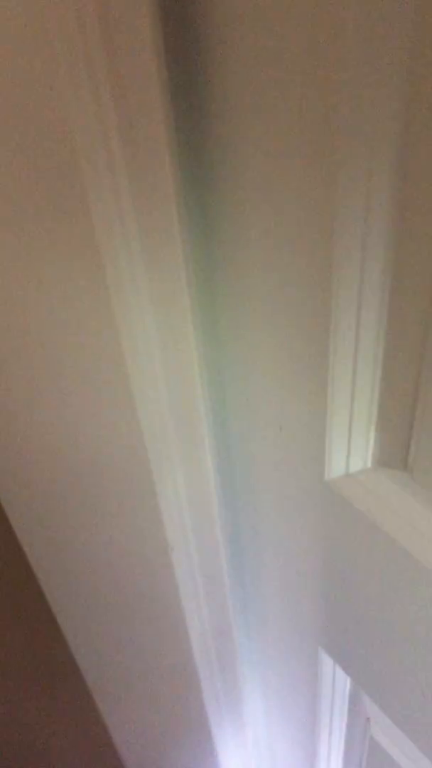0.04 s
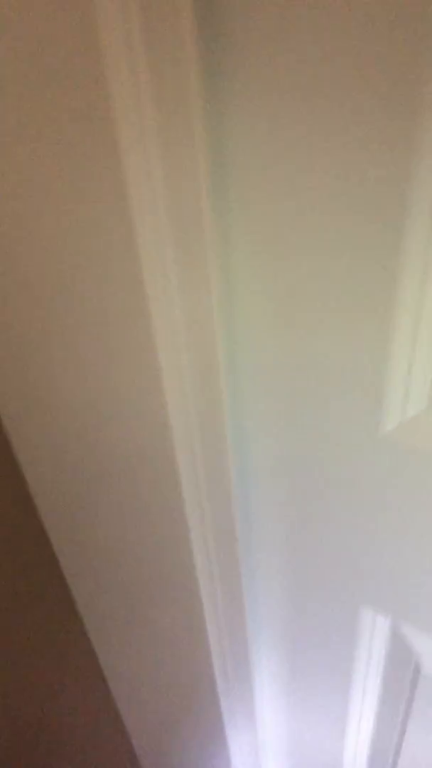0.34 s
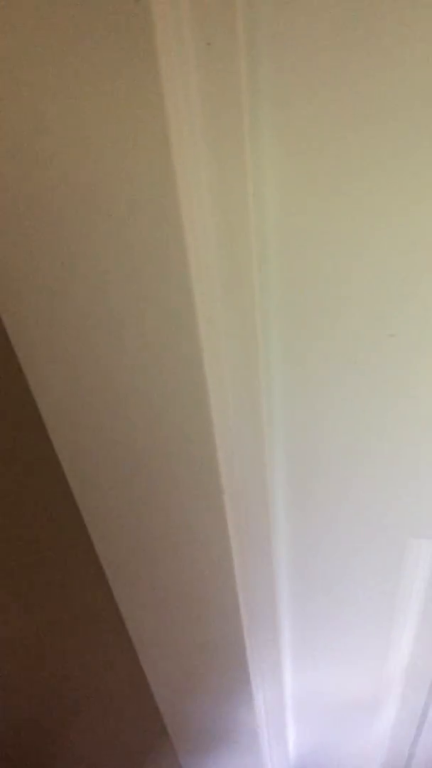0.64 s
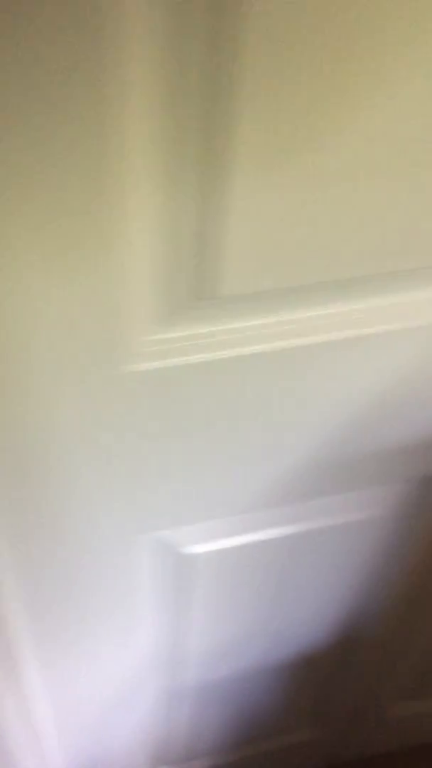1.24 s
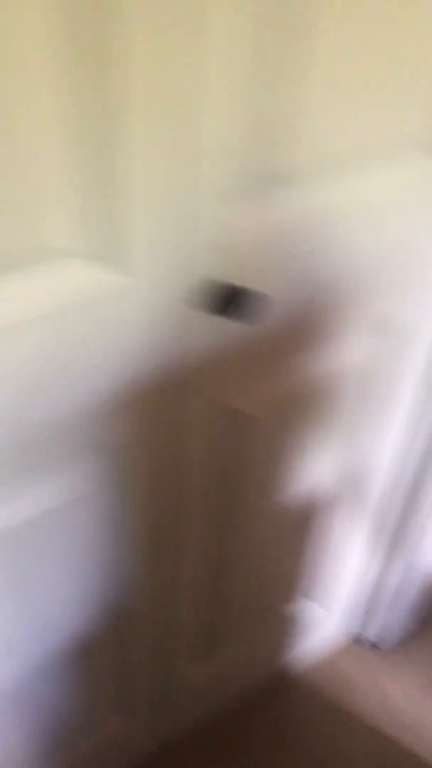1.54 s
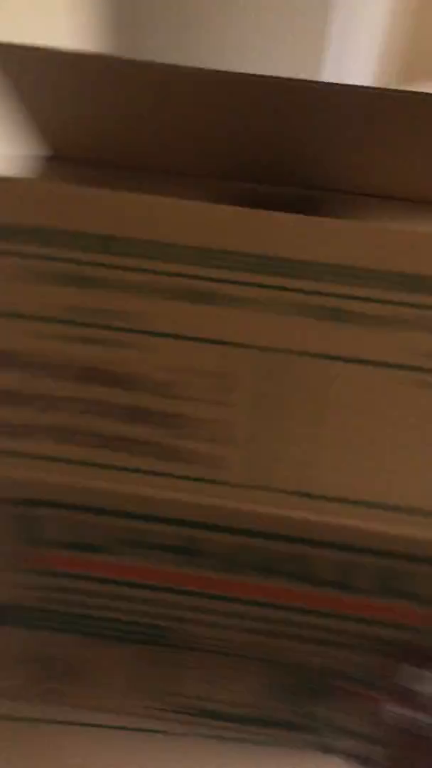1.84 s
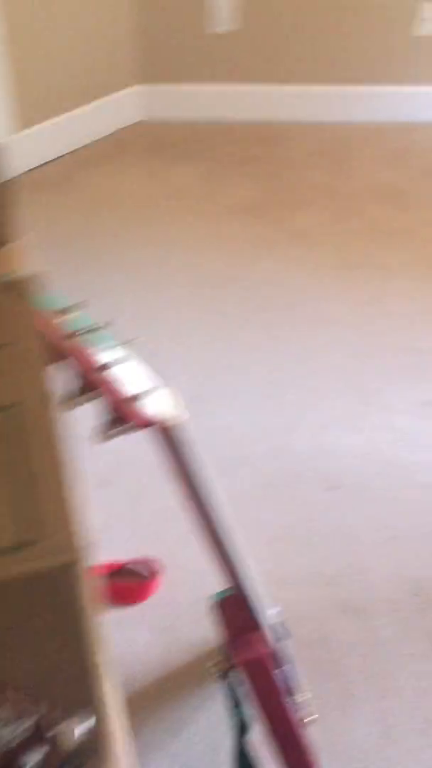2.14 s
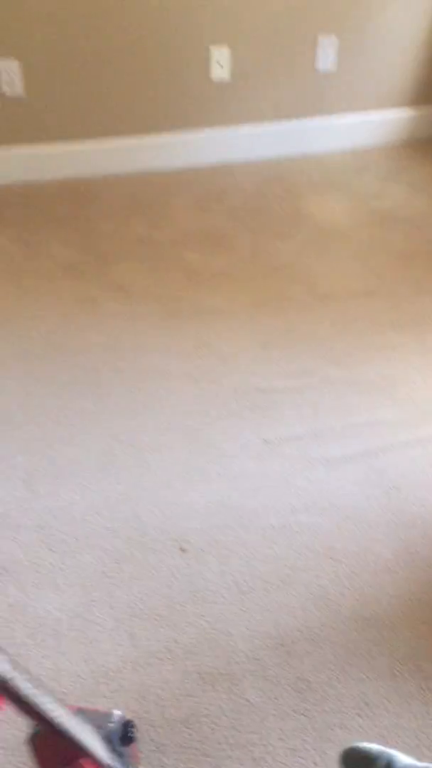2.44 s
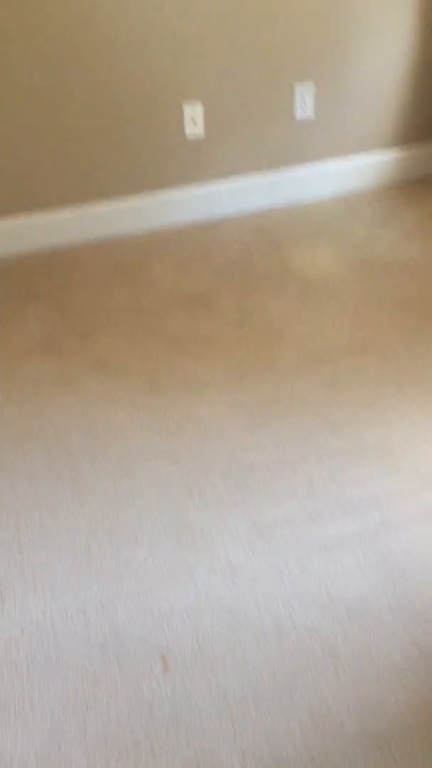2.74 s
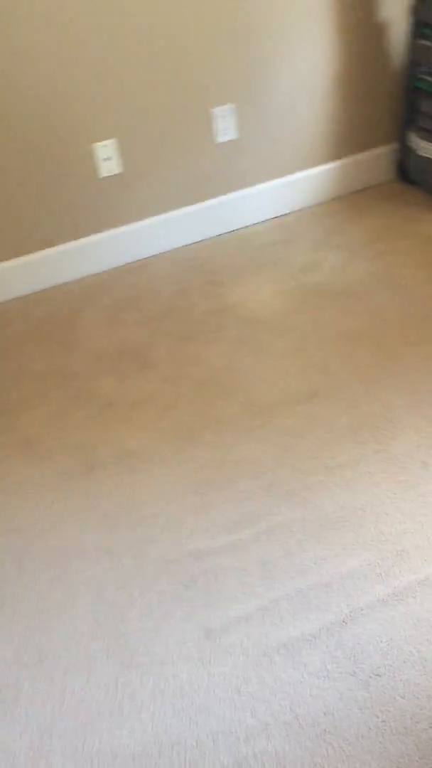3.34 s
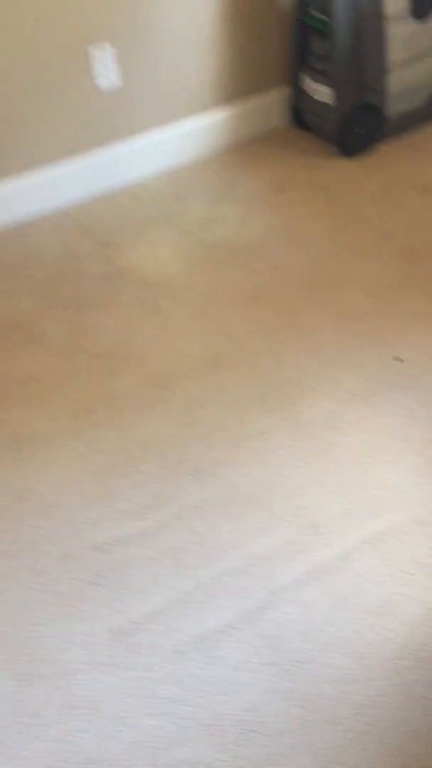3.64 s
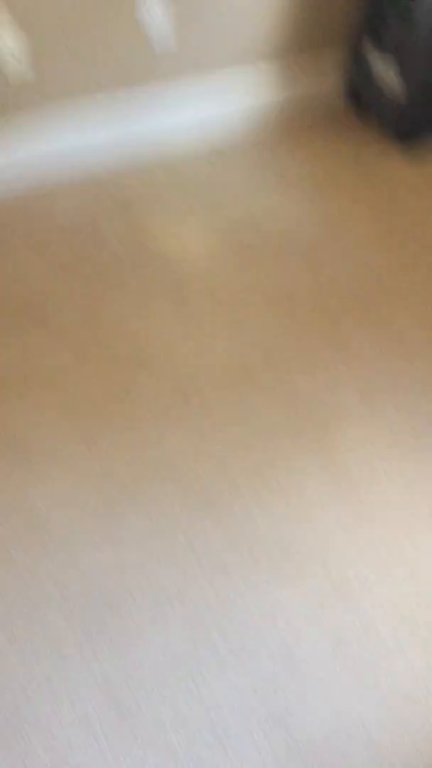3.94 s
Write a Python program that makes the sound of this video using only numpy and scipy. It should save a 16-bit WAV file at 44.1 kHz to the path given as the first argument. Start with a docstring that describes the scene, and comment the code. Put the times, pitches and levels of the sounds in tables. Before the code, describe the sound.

A wooden door brushes over carpet, knocks and clicks, followed by soft footsteps.

```python
"""A hollow wooden door is pushed open over carpet. From the start its lower edge brushes the pile,
and stick-slip friction makes the leaf chatter. Knocks excite the leaf's modes, most strongly near
0.9 s, and at 1.2 s the steel latch clicks. Someone then walks softly into the room, each step a thud
in the floor and a scuff on the pile. Throughout, the house booms and rumbles, a fan hums and moving
air hisses with a thin whistle."""
import sys
import numpy as np
from scipy import signal
from scipy.fft import rfft, irfft
from scipy.io import wavfile
from scipy.ndimage import uniform_filter1d, map_coordinates

SR = 44100
rng = np.random.default_rng(int(sys.argv[2]) if len(sys.argv) > 2 else 0)


def master(y):
    """Save y as 16-bit WAV."""
    cut = np.clip(np.atleast_2d(y).T, -1, 1)
    pcm = np.round(cut * 32767)  # scale
    wavfile.write(sys.argv[1], SR, pcm.astype(np.int16))


N = 176400
TOP_HZ = 15850

# Spectrum of a contact on wood. Each row: frequency in Hz, relative density in dB.
WOOD_SPECTRUM = [(100, -14), (300, 3.5), (600, -5), (1000, -4), (1400, -2), (2200, -1), (3300, -2),
                 (4800, -9.5), (7500, -15), (9300, -13.5), (10800, -25), (15500, -22)]


def door_knocks():
    """Impact excitation: each blow cracks on the wood and sets the leaf vibrating freely."""
    # Each row: start in seconds, contact gain in dB, contact cutoff in Hz, leaf gain in dB.
    knocks = [(0.191, -8, 1000, -27), (0.4456, -11, 2500, -10.5), (0.4873, -7.5, 7540, -22),
              (.502, -20, 2500, -14.5), (0.533, 1.5, 2220, -17), (0.886, -4.5, 1290, -11.5),
              (0.909, -3, 350, -11.5), (0.9221, -4.5, 8900, -0.5), (0.9253, -3, 3630, -17),
              (1.1977, -9.5, 1510, -16), (1.218, -8, 403, -17.5)]
    contacts, ringing = np.zeros(N), np.zeros(N)
    for at, db, cutoff_hz, leaf_db in knocks:
        blow = impact(WOOD_SPECTRUM, cutoff_hz, t60=0.076, room_db=-9.5)
        crack = np.hypot(1, undb(-2.5) * decay(clock()[:len(blow)], t60=0.0079))
        add(contacts, at, undb(db - 23) * blow * crack)
        add(ringing, at, undb(leaf_db) * leaf_modes())
    return wood_resonances(contacts) + ringing


def leaf_modes():
    """Modal superposition: the leaf rings as damped sines, a little differently at each blow."""
    # Each row: frequency in Hz, relative level in dB, time to fall 60 dB in seconds.
    modes = [(63.2, -2, 0.46), (103.2, 0, 0.58), (147, -14, 0.5), (172.3, 1.5, 0.31), (257, -14, 0.52),
             (282.4, -12, 0.4), (337, -12, 0.3), (541.4, -12.5, 0.13), (639, -20, 0.2), (1410, -13.5, 0.12),
             (1588, -20.5, 0.09), (1908, -11, 0.12), (2263, -15, 0.21), (3210, -16, 0.089)]
    t, out = clock()[:SR], 0
    for k, (hz, db, t60) in enumerate(modes):
        amplitude = (-1) ** k * undb(db + rng.standard_normal())
        detuned_hz = hz * (1 + 0.0037 * rng.standard_normal())
        out += amplitude * np.sin(2 * np.pi * detuned_hz * t) * decay(t, t60)
    return undb(-26.5) * out


def door_drag():
    """Stick-slip friction: the leaf chatters as its edge drags harder, heard through the wood."""
    # Each row: time in seconds, level in dB.
    levels = [(.15, -59), (.2, -44.5), (.25, -55), (.35, -61), (.4, -43.5), (.45, -41.5), (.5, -39.5),
              (.55, -47), (.6, -49), (.66, -65)]
    slips = colour(grains(spread=0.93), WOOD_SPECTRUM)
    muffled = signal.sosfilt(signal.butter(2, 3200, fs=SR, output="sos"), slips)
    dragging = (clock() > levels[0][0]) * (clock() < levels[-1][0])
    return wood_resonances(muffled * envelope(levels) * dragging)


def wood_resonances(x, depth_db=1.5, spacing_hz=32):
    """Dense upper modes act as a minimum-phase filter, which rings only after it is excited."""
    hz = np.fft.rfftfreq(N, 1 / SR)
    peaks = np.interp(hz / spacing_hz, np.arange(2000), rng.standard_normal(2000))
    depth = depth_db * np.clip(hz / 500, 0, 1) * np.clip(4000 / (hz + 1), 0, 1)
    gain = undb(depth * (np.clip(peaks, -2, 2) - 0.19))
    cepstrum = irfft(np.log(gain), N)
    response = np.exp(rfft(2 * cepstrum[:N // 2], N))
    return irfft(rfft(x) * response, N)


def carpet_brush():
    """Friction noise: carpet fibres flick past the door's edge, louder the faster it moves."""
    # Each row: time in seconds, relative level in dB.
    levels = [(0, -35), (.03, -25.5), (.1, -17), (.19, -10.5), (.33, -9), (.365, -7), (.394, -2.5),
              (.43, -5), (.5, -6), (.55, -3.5), (.6, -12), (.7, -14.5), (.87, -13), (.93, -19.5),
              (.97, -42)]
    # Each row: frequency in Hz, relative density in dB.
    pile_spectrum = [(250, -5.5), (320, 0), (470, -10.5), (600, -6.5), (830, -14), (1000, -9), (1600, -9),
                     (2400, -9.5), (3000, -13.5), (3800, -16), (4900, -20.5), (6100, -17.5), (7700, -23.5),
                     (9300, -21.5), (10400, -26.5), (12000, -26.5), (15500, -29.5)]
    fibres = colour(grains(spread=0.28), pile_spectrum)
    flutter_db = drift(60)
    return fibres * envelope(levels) * undb(flutter_db - 36) * (clock() < levels[-1][0])


def latch():
    """A hard impact is brief and so bright: the bolt ticks, the steel rings and the leaf shakes."""
    # Each row: start in seconds, click gain in dB, leaf gain in dB.
    clicks = [(1.2302, -35, -11)]
    # The ringing steel and the bolt's first touch. Each row: frequency in Hz, relative density in dB.
    steel_spectrum = [(300, 3), (850, -9), (1100, 8), (1450, 1), (2100, 2.5), (3700, -2.5), (5400, -1.5),
                      (6500, -4), (8500, -7), (10500, -10), (13500, -9), (15500, -5)]
    tick_spectrum = [(1500, -8), (5000, -6), (8500, 6), (10500, -12), (13500, -1), (15500, 5)]
    out = np.zeros(N)
    for at, db, leaf_db in clicks:
        add(out, at, undb(db) * impact(steel_spectrum, TOP_HZ, t60=0.038, room_db=-13.5))
        add(out, at, undb(db + 6) * noise(tick_spectrum) * decay(clock(), t60=0.0088))
        add(out, at, undb(leaf_db) * leaf_modes())
    return out


def impact(spectrum, cutoff_hz, t60, room_db):
    """Damping and reverberation: dense resonances die fast, and the room's tail loses treble first."""
    # Each row: frequency in Hz, reverberation time in seconds.
    room_t60 = [(200, 0.4), (2500, 0.29), (6000, .27), (14000, 0.22)]
    t = clock()[:SR // 2]
    hz = np.fft.rfftfreq(len(t), 1 / SR)
    resonances = rfft(noise(spectrum)[:len(t)]) / np.sqrt(1 + (hz / cutoff_hz) ** 4)
    octave = np.round(np.log2(np.maximum(hz, 125) / 125))
    out = 0
    for k in np.unique(octave):
        band = irfft(resonances * (octave == k), len(t))
        tail = undb(room_db) * decay(t, on_log(hz[octave == k].mean(), room_t60))
        out += band * np.hypot(decay(t, t60), tail)
    rise_s = 0.95 / cutoff_hz
    return out * (1 - np.exp(-(t / rise_s) ** 2))


def footsteps():
    """Cushioned impact and friction: heels thud in the floor, soles scuff and slide on the pile."""
    # Each row: start in seconds, thud level in dB, scuff level in dB.
    steps = [(0.029, -33, -61), (1.785, -34.5, -68), (1.93, -41, -58), (2.125, -61, -53),
             (2.76, -40, -60.5), (3.28, -42.5, -58.5), (3.495, -42, -70), (3.933, -44.5, -68)]
    # Each row: centre in seconds, half length in seconds, level in dB.
    slides = [(3.537, 0.19, -73)]
    # Each row: frequency in Hz, relative density in dB.
    thud_spectrum = [(25, -14), (45, -17.5), (65, 4), (95, -8), (140, -10), (250, -25.5), (500, -48.5)]
    scuff_spectrum = [(100, -14.5), (300, 4), (700, -0.5), (2000, -6.5), (4000, -18.5), (8000, -31.5),
                      (15500, -40)]
    slide_spectrum = [(1500, -3), (5000, 6), (8000, 1), (15500, 1)]
    out, t = np.zeros(N), clock()
    for at, thud_db, scuff_db in steps:
        add(out, at, undb(thud_db) * noise(thud_spectrum) * swell(t, rise_s=0.011))
        add(out, at, undb(scuff_db) * noise(scuff_spectrum) * swell(t, rise_s=0.023))
    for at, half_s, db in slides:
        out += undb(db) * noise(slide_spectrum) * np.exp(-((t - at) / half_s) ** 2)
    return out


def bumps(half_cycles=0.62):
    """Structure-borne sound and air pressure: soft blows through floor and hand, and a push of air as the door
    meets its stop, swing once or twice and stop."""
    # Each row: centre in seconds, frequency in Hz, peak level in dB.
    blows = [(0.042, 97, -26.5), (.966, 76, -21.5), (1.236, 70, -31), (1.27, 108, -27), (1.804, 74, -22.5),
             (3.3, 380, -48), (3.514, 85, -34), (3.982, 288, -39.5), (3.994, 333, -43)]
    out = np.zeros(N)
    for at, hz, db in blows:
        cycles = hz * (clock() - at)
        out += undb(db) * np.cos(2 * np.pi * cycles) * np.exp(-(cycles / half_cycles) ** 2)
    return out


def house_rumble():
    """Narrow-band and broadband noise: the room's lowest boom wavers over the rumble of the house."""
    # Each row: time in seconds, relative level in dB.
    boom_levels = [(0, -34), (.13, -41), (.26, -27), (.34, -36.5), (.43, -42), (.6, -35), (.8, -38),
                   (1.1, -42), (1.4, -45), (1.7, -36), (1.87, -49), (2.1, -48.5), (2.45, -43.5),
                   (2.65, -38.5), (2.83, -34.5), (3.15, -48.5), (3.32, -36.5), (3.45, -62), (3.82, -41.5),
                   (4, -66)]
    rumble_levels = [(0, -42.5), (.7, -38), (1.3, -41.5), (2, -46.5), (3, -47), (4, -49)]
    # Each row: frequency in Hz, relative density in dB.
    spectrum = [(15, -48), (25, -28.5), (38, -16.5), (59, 2.5), (69, -5.5), (81, -2), (107, -6.5),
                (148, -5.5), (173, -11), (220, -12), (234, -28), (244, -40), (300, -38), (390, -66),
                (660, -120)]
    boom = tone(hz=54.7 + 2.437 * drift(17)) * undb(0.96 * drift(12) - 1.5)
    return boom * envelope(boom_levels) + noise(spectrum) * envelope(rumble_levels)


def fan_hum():
    """Tonal fan noise: one partial, slightly modulated in frequency and amplitude."""
    # Each row: time in seconds, relative level in dB.
    levels = [(0, -56), (1, -54), (1.6, -51.5), (2.1, -56.5), (3, -62.5), (4, -63)]
    return tone(hz=216.9 + 1.48 * drift(8)) * undb(2 * drift(6.7) - 3.5) * envelope(levels)


def air_whistle():
    """A flow tone: the air whistles thinly, and random modulation broadens its spectral line."""
    # Each row: time in seconds, frequency in Hz, relative level in dB.
    course = [(0, 810, -58.5), (1.1, 807, -67.5), (1.42, 805, -63), (1.62, 816, -75), (2.05, 882, -66),
              (2.3, 830, -66), (2.6, 882, -70), (2.97, 845, -59), (3.3, 823, -73), (3.5, 890, -68),
              (3.8, 840, -62), (4, 846, -73)]
    at, hz, db = np.array(course).T
    pitch_hz = np.interp(clock(), at, hz) + 8.6 * drift(50)
    flutter_db = 5.5 * drift(30) - 5.5
    return tone(pitch_hz) * undb(np.interp(clock(), at, db) + flutter_db)


def air_flow():
    """Broadband flow noise: moving air hisses, coloured by the room."""
    # Each row: frequency in Hz, relative density in dB.
    spectrum = [(150, -16), (250, -2.5), (360, -3), (516, -8), (705, -10), (850, -2), (1030, -8),
                (1480, -5.5), (2360, -13), (3110, -20.5), (4960, -28), (5500, -27), (7600, -32.5),
                (9300, -31.5), (10400, -37), (11500, -34), (15500, -36.5)]
    # Each row: time in seconds, level in dB.
    levels = [(0, -57), (1.4, -60.5), (1.7, -58.5), (2.2, -59.5), (2.9, -58), (3.2, -59.5), (4, -58.5)]
    return standing_waves(noise(spectrum)) * envelope(levels)


def standing_waves(x, depth_db=3.5, spacing_hz=70, changes_per_s=7):
    """Interference: the room's spectral peaks and dips drift as the microphone moves through them."""
    hz, t, spectra = signal.stft(x, SR, nperseg=2048)
    field = rng.standard_normal((1024, 64))
    position = np.meshgrid(hz / spacing_hz, t * changes_per_s, indexing="ij")
    db = depth_db * map_coordinates(field, position, mode="mirror")
    treble_taper = np.clip(3000 / (hz[:, None] + 1), 0, 1)
    return unit(signal.istft(spectra * undb(db * treble_taper), SR)[1][:N])


def undb(db):
    """Decibels to amplitude ratio."""
    return 10 ** (np.asarray(db) / 20)


def unit(x):
    """Normalise to rms 1."""
    return x / np.sqrt(np.mean(x ** 2))


def clock():
    """Time of each sample in seconds."""
    return np.arange(N) / SR


def envelope(rows):
    """Gain over time from points in seconds and dB."""
    return undb(np.interp(clock(), *np.array(rows).T))


def decay(t, t60):
    """Exponential decay by 60 dB in t60 seconds."""
    return np.exp(-np.log(1000) * t / t60)


def swell(t, rise_s):
    """A critically damped pulse that peaks at rise_s."""
    return t / rise_s * np.exp(1 - t / rise_s)


def on_log(hz, rows):
    """Interpolate a table on a log-frequency axis."""
    row_hz, values = np.array(rows).T
    return np.interp(np.log(hz + 1), np.log(row_hz), values)


def colour(x, rows):
    """Filter x by a spectrum, falling steeply past its ends; rms 1."""
    hz = np.fft.rfftfreq(N, 1 / SR) + 1
    below = 1 + (.8 * rows[0][0] / hz) ** 12
    above = 1 + (hz / rows[-1][0] / 1.15) ** 12
    return unit(irfft(rfft(x) * undb(on_log(hz, rows)) / np.sqrt(below * above), N))


def noise(rows):
    """Gaussian noise with a given spectrum."""
    return colour(rng.standard_normal(N), rows)


def grains(spread):
    """White noise roughened by log-normal amplitudes."""
    return rng.standard_normal(N) * np.exp(spread * rng.standard_normal(N))


def drift(changes_per_s):
    """Smooth random modulation of rms 1."""
    hold = int(SR / changes_per_s)
    stairs = np.repeat(rng.standard_normal(N // hold + 1), hold)
    return unit(uniform_filter1d(stairs, hold)[:N])


def tone(hz):
    """A sine of rms 1 whose phase integrates a moving frequency."""
    return np.sqrt(2) * np.sin(2 * np.pi * np.cumsum(hz) / SR)


def add(out, at, x):
    """Superpose x on out from a time in seconds."""
    start = max(int(at * SR), 0)
    out[start:start + len(x)] += x[:N - start]


def scene():
    """Superposition: door, feet and house add at one microphone."""
    door = door_knocks() + door_drag() + carpet_brush() + latch()
    house = house_rumble() + fan_hum() + air_whistle() + air_flow()
    return (door + footsteps() + bumps() + house)[None]


def record(dry):
    """Band limiting: the microphone cuts the deepest bass and the highest treble."""
    thin = signal.sosfilt(signal.butter(5, 40, "high", fs=SR, output="sos"), dry)
    return signal.sosfilt(signal.ellip(10, .2, 70, TOP_HZ, fs=SR, output="sos"), thin)


dry = scene()
out = record(dry)
master(out)
```